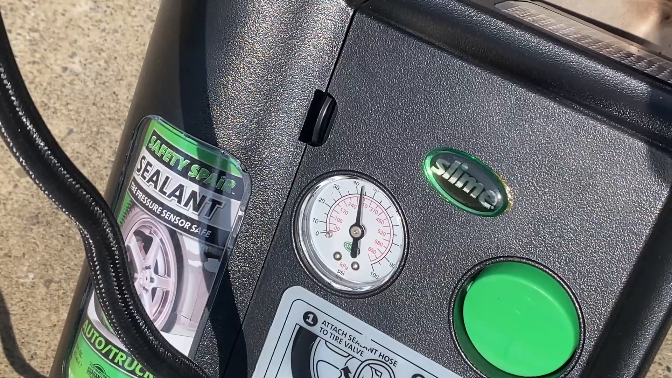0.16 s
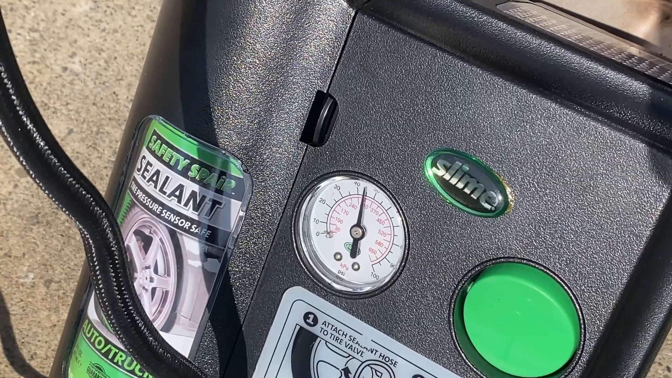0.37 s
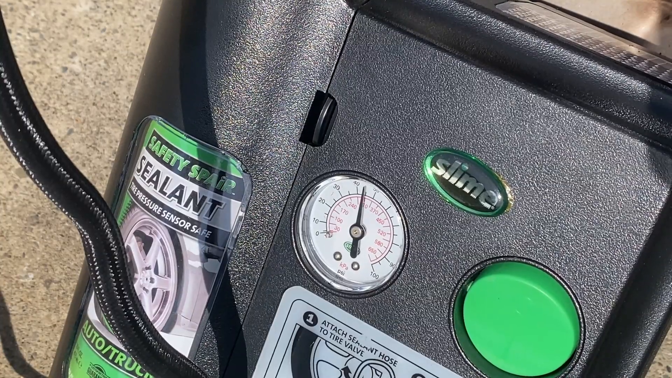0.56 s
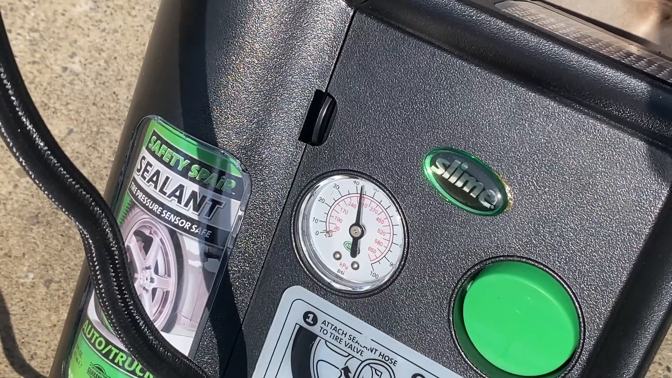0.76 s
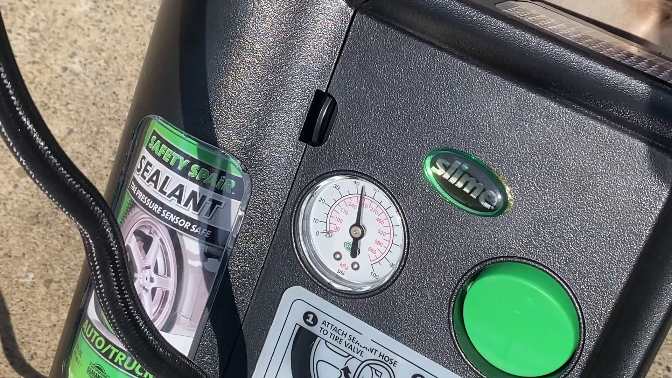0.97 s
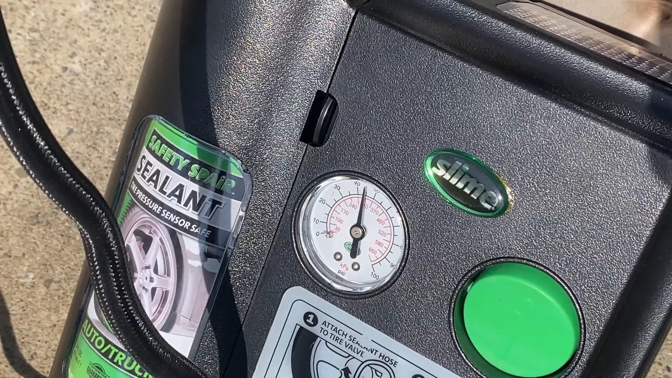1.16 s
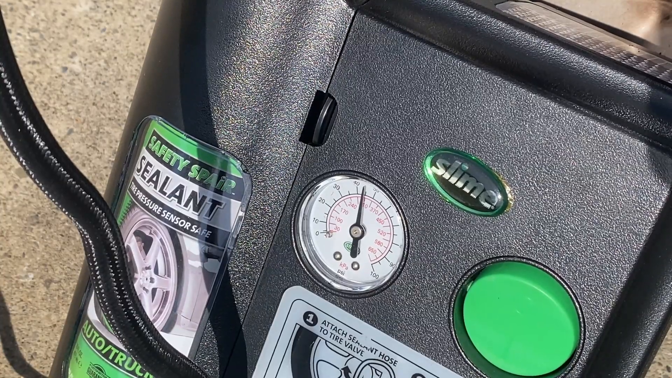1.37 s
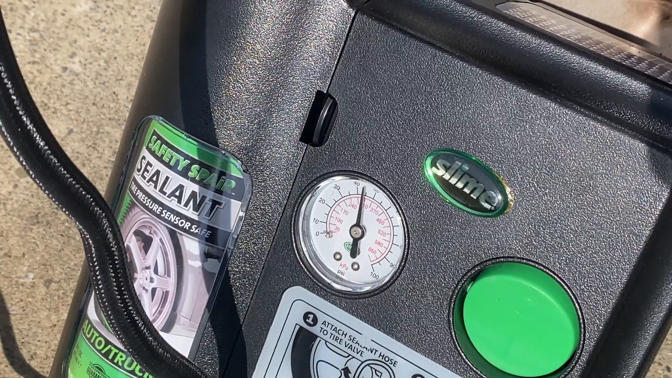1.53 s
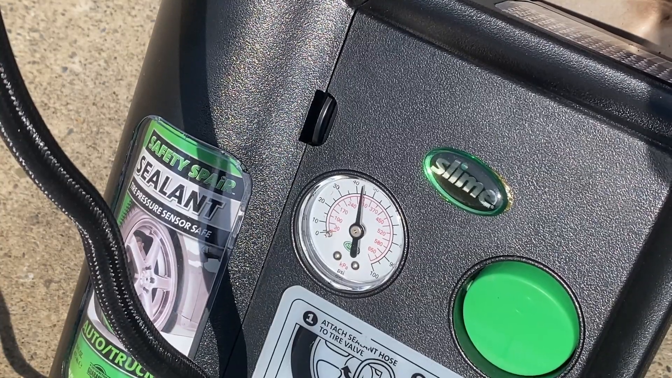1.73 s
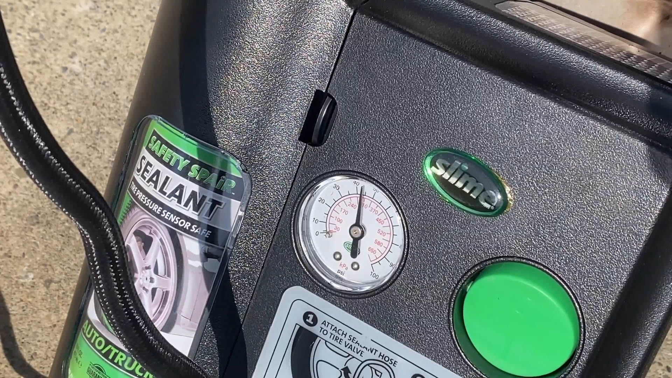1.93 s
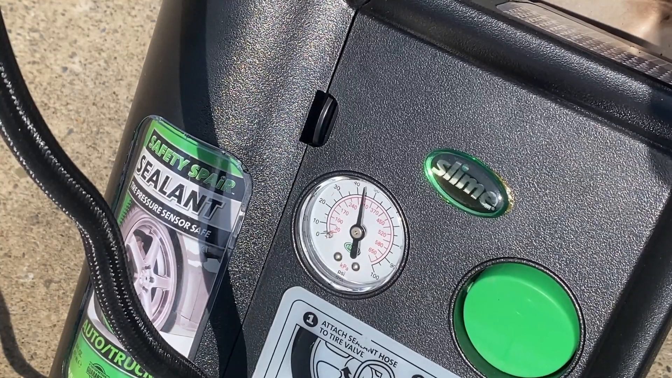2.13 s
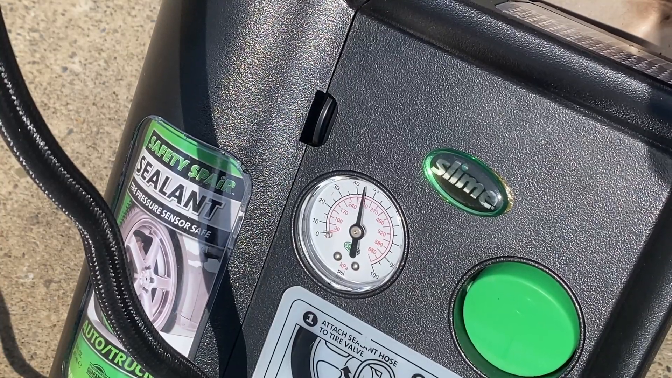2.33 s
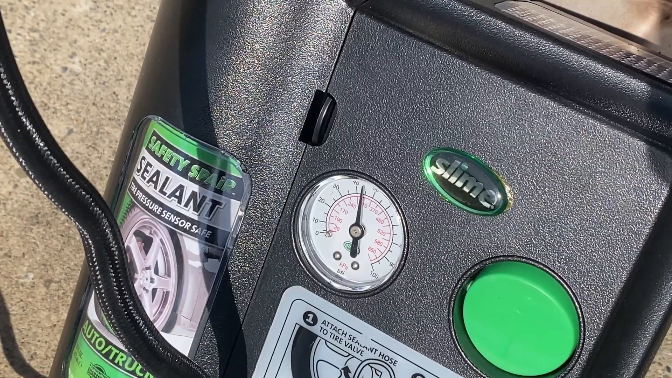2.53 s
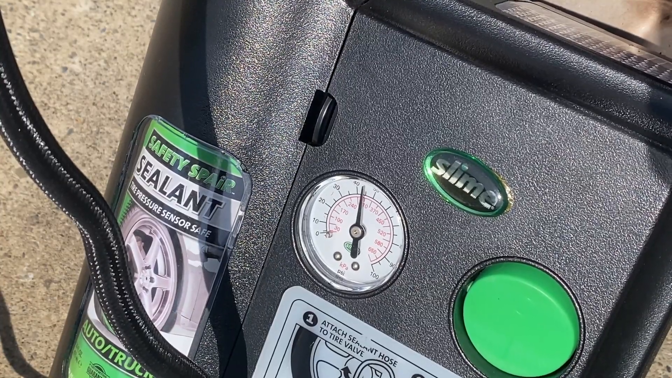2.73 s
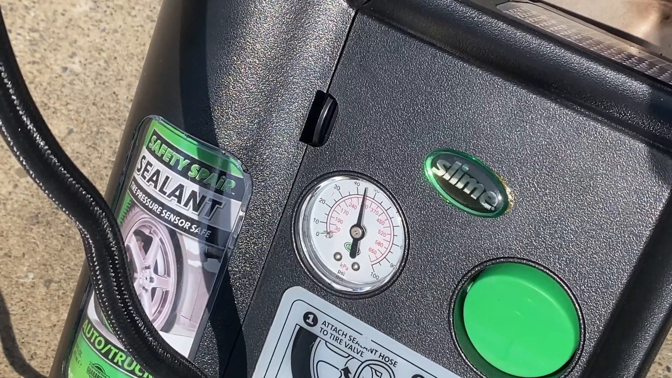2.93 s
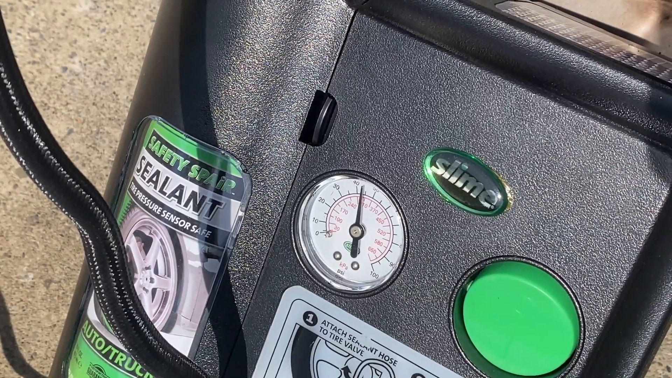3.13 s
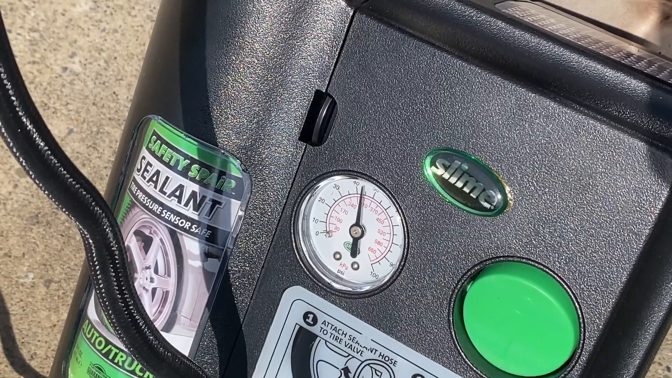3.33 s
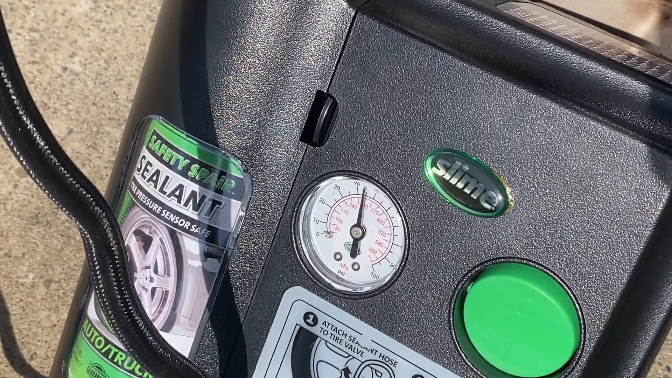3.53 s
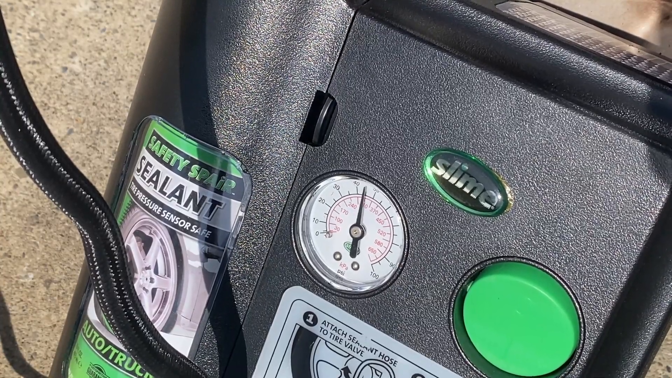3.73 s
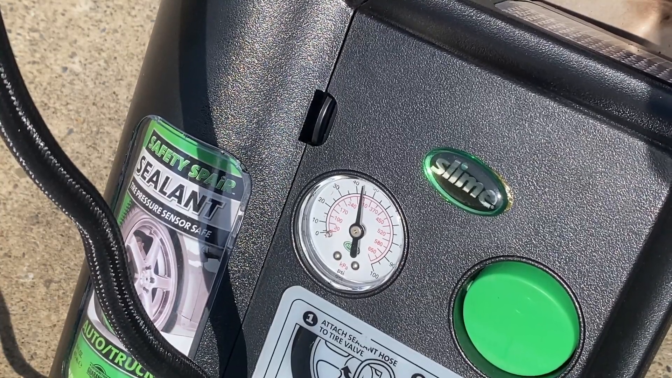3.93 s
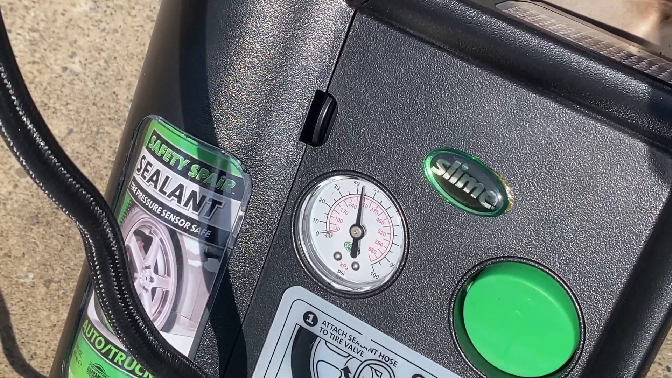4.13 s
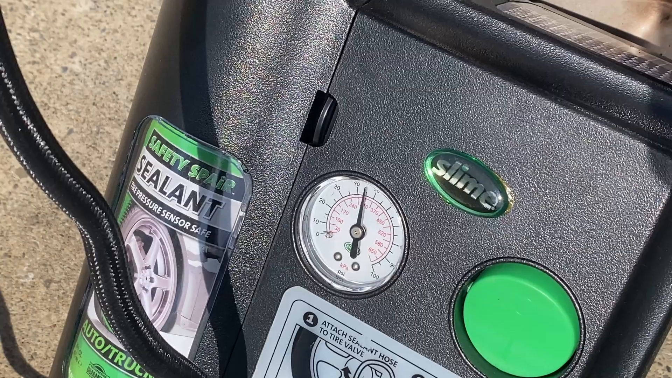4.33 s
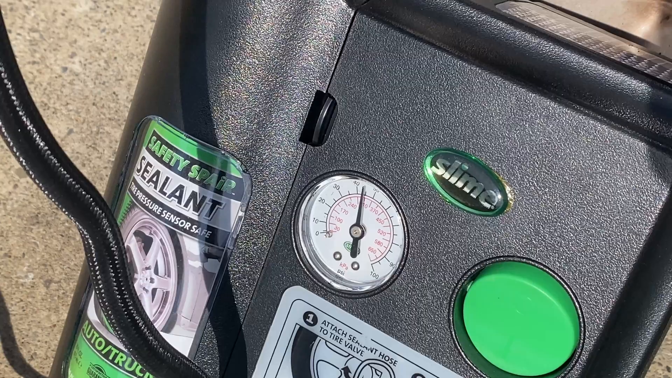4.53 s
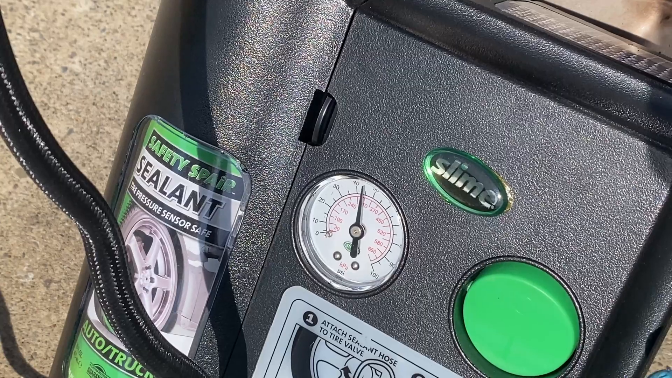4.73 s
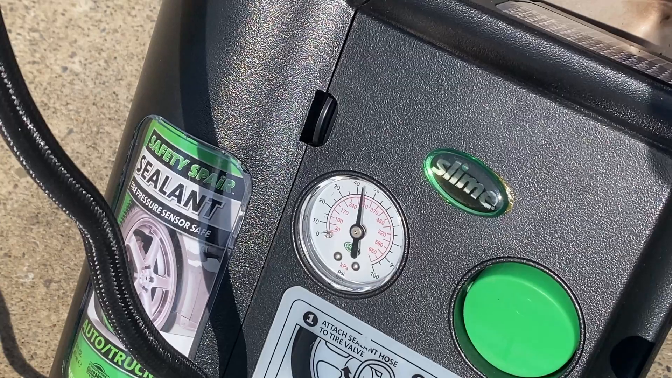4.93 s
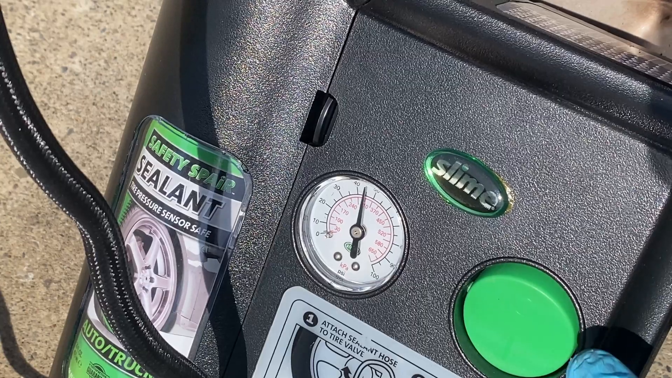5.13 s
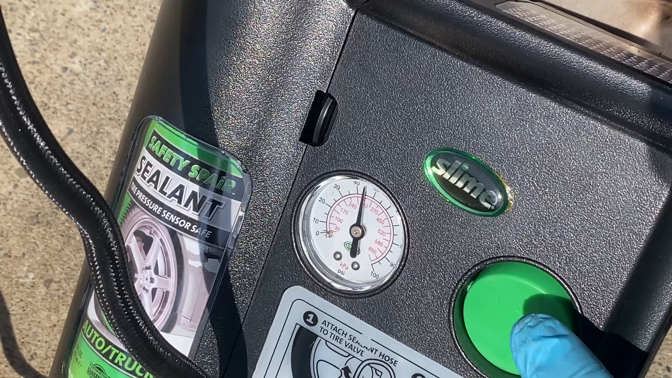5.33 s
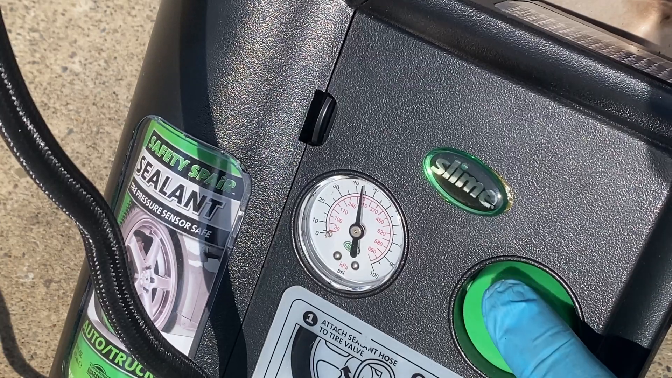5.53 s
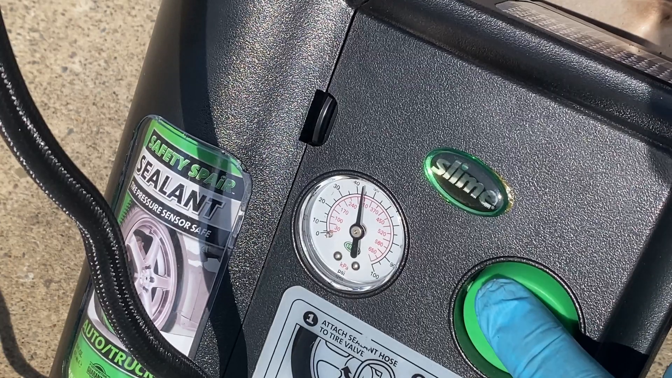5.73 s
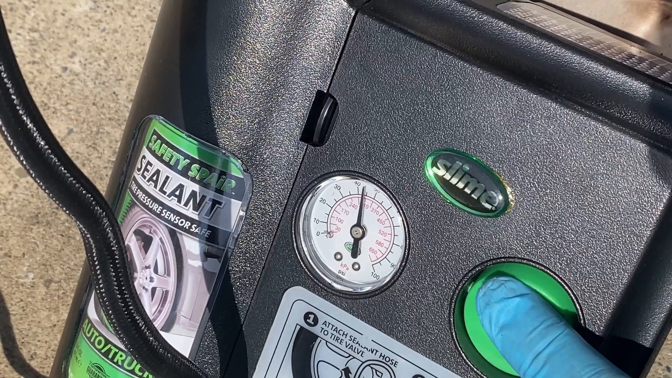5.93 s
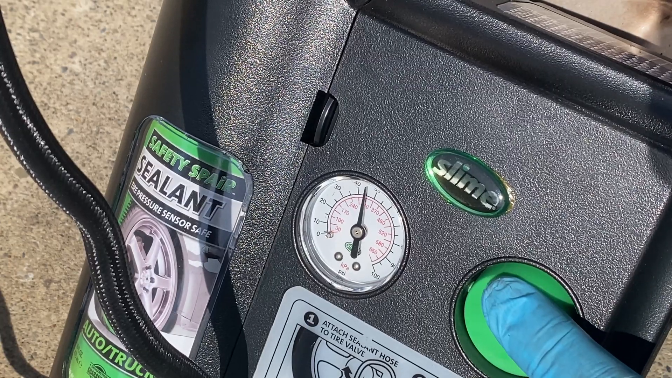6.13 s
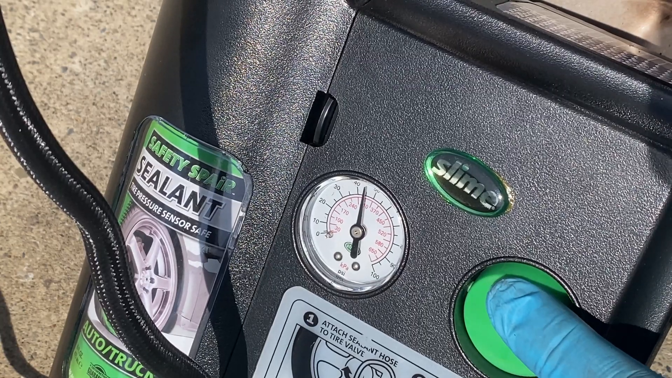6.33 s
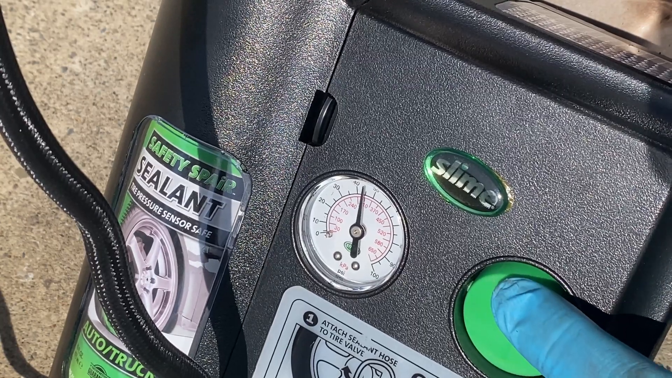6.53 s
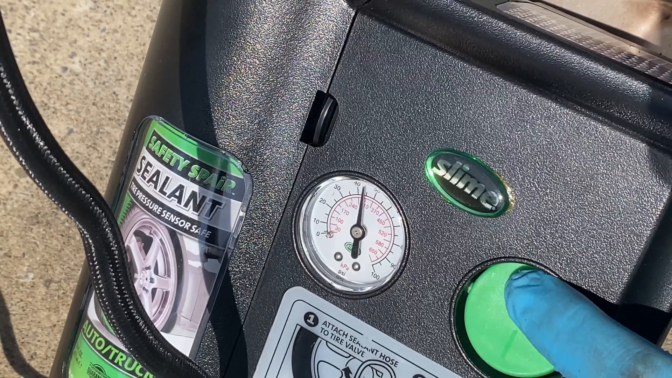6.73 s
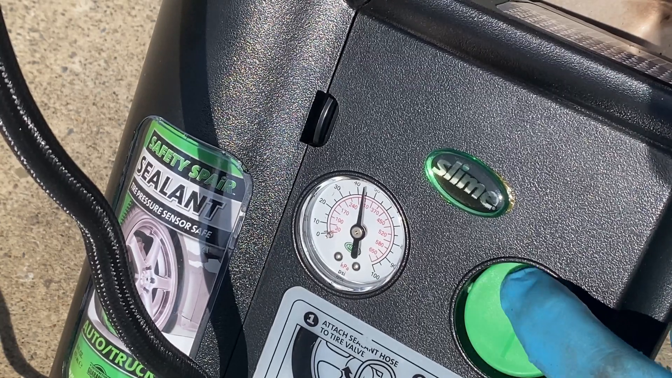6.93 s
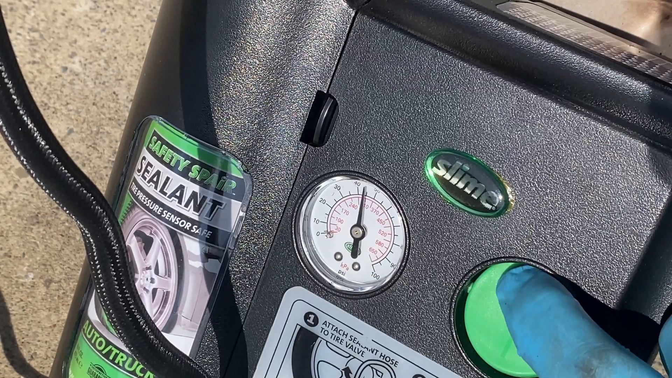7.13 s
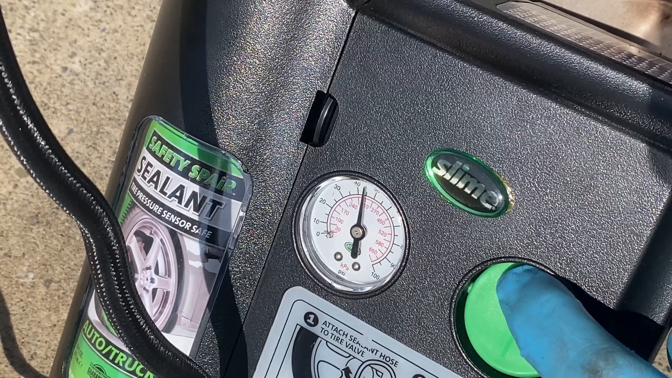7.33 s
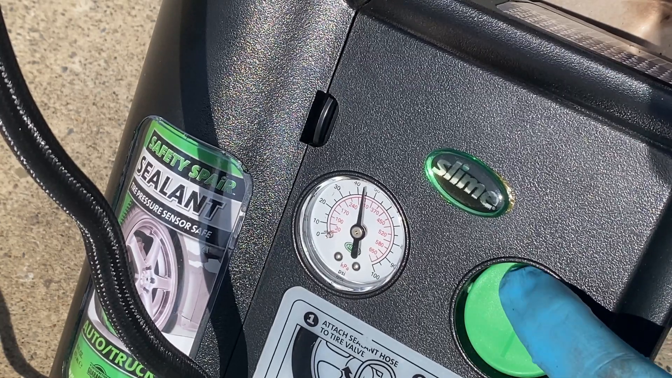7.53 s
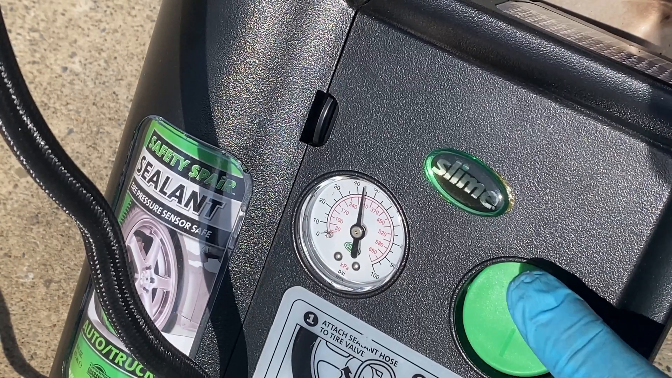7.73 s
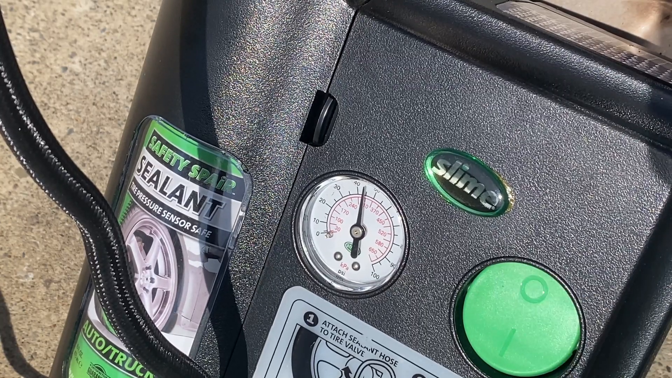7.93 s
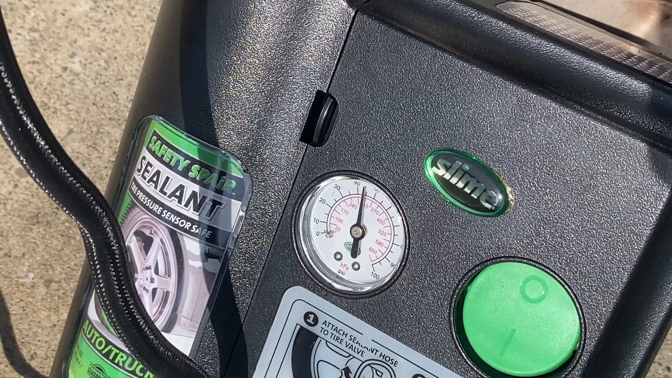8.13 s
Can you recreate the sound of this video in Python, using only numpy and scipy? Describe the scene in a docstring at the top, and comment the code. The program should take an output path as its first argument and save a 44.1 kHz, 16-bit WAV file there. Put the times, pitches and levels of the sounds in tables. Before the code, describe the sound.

From 0 s a small piston air pump is already running at full speed, very close, outdoors on concrete. About forty-one strokes a second blur into a harsh, buzzing drone, strongest in the mids around 400 to 1200 Hz, with motor hum, gear whine, dense plastic rattle, valve hiss and thin reed snaps. Its speed wavers only slightly and it grows about one decibel louder by 6.7 s; a car's low idle is mostly masked beneath. At 6.7 s the power is cut: the buzz collapses, tiny falling gear squeals chirp, and near 6.82 s a short kick-back knock with a squeaky tone ends it by about 6.9 s. The idling car's soft bass drone and rumble then emerge, throbbing about six times a second until 8.3 s. Around 7.67 s a small, dull plastic button tick sounds close by. Faint microphone hiss lies underneath.

```python
"""A small piston air pump in a plastic case runs on concrete close to a phone, while a car idles nearby.
Strokes, gear teeth and motor poles hum through the case; noisy knocks, valve puffs and reed snaps join in.
After 6.7 s the pump is switched off, coasts with short gear squeals and kicks back once as a level jump. The
car's drone, slowly wavering tones over filtered noise, is then heard louder and throbs. Near 7.7 s a button
gives small plastic ticks, made of noise bursts in narrow bands."""
import sys
import numpy as np
from scipy import signal
from scipy.fft import rfft, irfft, next_fast_len
from scipy.io import wavfile
from scipy.ndimage import uniform_filter1d

SR = 44100
rng = np.random.default_rng(int(sys.argv[2]) if len(sys.argv) > 2 else 0)


def log_audio(samples):
    """Write samples as a 16-bit WAV file to the path given in sys.argv[1]."""
    # one column per channel
    frames = np.atleast_2d(samples).T
    # limit to full scale, then quantise
    limited = np.clip(frames, -1, 1)
    pcm = np.round(limited * 32767).astype(np.int16)
    wavfile.write(sys.argv[1], SR, pcm)


N = 365588
T = np.arange(N) / SR  # time, s
SIZE = next_fast_len(N + 8192)  # transform length, with room for echoes to die
F = np.arange(SIZE // 2 + 1) * SR / SIZE  # frequencies, Hz
OFF_S = 6.7  # power cut, s


def undb(db):
    """Turn dB into an amplitude factor."""
    return np.exp(np.asarray(db) * float(np.log(10) / 20))


def level(x, db):
    """Scale a sound so its average (RMS) level is db."""
    return x * undb(db) / np.sqrt(np.mean(x ** 2))


def curves(rows):
    """Join the rows of a time table with straight lines, one curve per column after the seconds."""
    seconds, *columns = np.transpose(rows)
    return [np.interp(T, seconds, column) for column in columns]


def over_hz(points):
    """Join (Hz, value) points with straight lines over log frequency."""
    hz, value = np.transpose(points)
    return np.interp(np.log(F + 1), np.log(hz + 1), value)


def colour(x, gain):
    """Filter a sound by a gain for each frequency."""
    return irfft(rfft(x, SIZE) * gain, SIZE)[..., :N]


def band(x, low_hz, high_hz, order):
    """Keep only the band between two frequencies."""
    sos = signal.butter(order, [low_hz, high_hz], "band", fs=SR, output="sos")
    return signal.sosfilt(sos, x)


def walk(rate):
    """Random levels every 1 / rate s, joined smoothly; spread near 1."""
    step = int(SR / rate)
    coarse = np.arange(0, N / step + 1, 1 / 16)
    levels = rng.standard_normal(N // step + 2)
    smooth = uniform_filter1d(np.interp(coarse, np.arange(N // step + 2), levels), size=16)
    return np.interp(T, coarse * step / SR, 1.32 * smooth).astype(np.float32)


def bump(turn, at, width):
    """A smooth swell once a turn; place and width are shares of a turn."""
    return np.exp((np.cos(2 * np.pi * (turn - at)) - 1) / (2 * np.pi * width) ** 2)


# Resonances of the plastic case. Each row: centre in Hz, width in Hz, relative level in dB.
CASE_RESONANCES = [(467, 104, -5), (584, 130, -12), (768, 66, -3), (978, 140, -3), (1166, 155, -3),
                   (1434, 100, -6.5), (2030, 234, -15), (2713, 126, -22.5), (3114, 360, -28.5),
                   (4036, 190, -28.5), (4380, 150, -26.5), (4850, 160, -31), (7266, 390, -25),
                   (7900, 86, -26), (9240, 360, -32.5)]
# How strongly the case answers between them. Each row: frequency in Hz, relative level in dB.
CASE_BASE = [(40, -61.5), (150, -27.5), (300, -18), (600, -7), (1200, -15), (1550, -10.5), (1780, -21.5),
             (2400, -31.5), (3600, -35.5), (6300, -36), (8500, -34), (10400, -39.5), (12600, -68.5),
             (15500, -56.5)]


def case_response():
    """The plastic case answers a blow with resonances over a broad base, never before the blow."""
    power = undb(over_hz(CASE_BASE)) ** 2
    for hz, width_hz, db in CASE_RESONANCES:
        power = power + undb(db) ** 2 / (1 + ((F - hz) / (width_hz / 2)) ** 2) ** 2
    # Folding the cepstrum gives the response that starts as early as possible (minimum phase).
    cepstrum = irfft(np.log(power) / 2, SIZE)
    cepstrum[1:SIZE // 2] *= 2
    cepstrum[SIZE // 2 + 1:] = 0
    return np.exp(rfft(cepstrum))


GEAR_RATIO = 50 / 11  # motor turns per crank turn
# Tones of the piston stroke. Each row: multiple of crank speed, relative level in dB.
STROKE_TONES = [(1, -30), (2, -12.5), (3, -15), (4, -15.5), (5, -10.5), (6, -14.5), (7, -19), (8, -15),
                (9, -6), (10, 0), (11, -.5), (12, -11), (13, -2.5), (14, .5), (15, -11), (16, -10),
                (17, -7), (18, -12), (19, -9), (20, -13), (21, -14), (22, -10), (23, -6), (24, -9),
                (25, -11), (26, -9), (27, -16), (28, -11), (29, -10), (30, -17), (31, -17), (32, -18),
                (33, -11), (34, -14), (35, -9), (36, -11), (37, -12), (38, -12), (39, -15)]
# Motor unbalance and poles, shifted by the uneven load of the crank.
# Each row: multiple of motor speed, crank turns added per crank turn, relative level in dB.
MOTOR_TONES = [(1, 0, -29), (1, 1, -27), (1, 2, -23), (1, 3, -23), (1, 4, -19), (1, 5, -17), (1, 6, -14),
               (1, 14, -14), (1, 15, -15), (3, -2, -16), (3, -1, -10), (3, 0, 0), (3, 1, -16), (3, 2, -12),
               (3, 9, -14), (3, 10, -13), (3, 12, -15), (3, 13, -14), (3, 14, -13), (3, 15, -14),
               (-1, 17, -18), (-1, 18, -16), (-1, 22, -17), (-1, 27, -16), (-3, 38, -15), (-3, 49, -16),
               (-3, 50, -13), (-3, 51, -17)]
# Gear teeth meeting, with side tones. Each row: multiple of crank speed, relative level in dB.
MESH_TONES = [(43, -24), (46, -23), (47, -18), (48, -16), (49, -18), (50, -15), (51, -2.5), (53, -17),
              (55, -26), (57, -26)]


def tones(turn):
    """Steady partials of stroke, motor and gear mesh, with small random flutter."""
    flutter_db, valve_turn, phase_spread = .8, .96, -.054
    turn = (turn % 11).astype(np.float32)  # crank and motor meet again after 11 turns
    flutters = [flutter_db * walk(12) for _ in range(9)]
    slips = [.005 * walk(17) for _ in range(7)]  # radians per multiple
    # Partials away from the thump reach the air by unlike paths (radians).
    unlike = np.clip((np.abs(np.arange(64) - 11) - 3) / 4, 0, 1.5)
    offsets = (unlike * rng.standard_normal(64)).tolist()
    shakes = {k: .4 * walk(8) for k in (1, 3)}

    stroke = 0
    for k, db in STROKE_TONES:
        phase = 2 * np.pi * k * (turn - valve_turn) + k * slips[k % 7]
        phase = phase - phase_spread * (k - 11) ** 2 + offsets[k]
        stroke = stroke + undb(db + flutters[k % 9]) * np.cos(phase)

    motor = 0
    for k, added, db in MOTOR_TONES:
        phase = 2 * np.pi * (k * GEAR_RATIO + added) * turn + shakes[abs(k)]
        phase = phase - phase_spread * added ** 2 + offsets[added + 9]
        motor = motor + undb(db) * np.cos(phase)

    play = .14 * walk(60)  # backlash shakes all teeth alike
    mesh = sum(undb(db) * np.cos(2 * np.pi * k * (turn - .43) + play) for k, db in MESH_TONES)
    return stroke + motor + undb(-2.0 + flutter_db * walk(40)) * mesh


# Spots of the crank turn where parts knock. Each row: place as a share of a turn, strength.
KNOCK_SPOTS = [(.03, .5), (.21, .3), (.33, .4), (.47, .25), (.56, .35), (.66, .9), (.81, .8), (.93, .7)]
WORN, WORN_WOBBLE = .55, .6  # strength of repeating knocks; depth of the motor's push


def rattle(turn):
    """Teeth and loose parts knock densely (first); worn spots repeat each turn, pushed by the motor (second)."""
    worn = np.interp(turn, np.arange(768) / 768, rng.standard_normal(768), period=1)
    push = 1 + WORN_WOBBLE * sum(np.cos(2 * np.pi * k * GEAR_RATIO * turn) for k in (1, 3))
    # About 800 random knocks a second.
    knocks = 2.2 * (rng.random(N) < 800 / SR) * rng.standard_normal(N)
    spots = sum(strength * bump(turn, at, .015) for at, strength in KNOCK_SPOTS)
    load = 1 + spots * undb(1.5 * walk(150))
    return load * (rng.standard_normal(N) + knocks), load * WORN * worn * push


# Short hits, each on its own part of the case, most of the high ones first.
# Each row: place as a share of a turn, ring in Hz, width in Hz, level in dB against the pump's level.
STRIKES = [(.52, 1490, 260, -20), (0.629, 990, 176, -15.5), (.66, 1188, 212, -13.5), (.86, 771, 263, -15.5),
           (.02, 1110, 250, -14), (.35, 1489, 254, -18.5), (.66, 2948, 824, -29.5)]
STRIKE_TURNS, STRIKE_SCATTER_DB = .045, 3  # length of a hit in turns; spread of its strength


def strikes(turn):
    """Short scraping hits, once a turn each, ring single parts of the case."""
    out = np.zeros(N)
    for at, hz, width_hz, db in STRIKES:
        strength = undb(STRIKE_SCATTER_DB * walk(41))
        hit = bump(turn, at, STRIKE_TURNS) * strength * rng.standard_normal(N)
        out += level(band(hit, hz - width_hz / 2, hz + width_hz / 2, 2), db)
    return out


def valves(turn):
    """Air hisses past the piston and puffs as the valve opens; the puff lies in the highest treble."""
    puff = 2.3 * bump(turn, .97, .06) * undb(2.5 * walk(41)) + .6 * bump(turn, .72, .04)
    top = 1 / (1 + (8400 / (F + 1)) ** 16)
    return rng.standard_normal(N) + colour(puff * rng.standard_normal(N), top)


SNAP_AT, SNAP_HZ, SNAP_WIDTH_HZ = .9, 5500, 3400  # share of a turn; ring and its width
SNAP_SCATTER_DB, SNAP_S = 3.5, 0.0059  # spread of strength; decay time constant


def snaps(turn):
    """The valve reed snaps once a turn, each time with its own strength and a little early or late."""
    chance = rng.standard_normal((int(turn[-1]) + 2, 2))
    late = .015 * chance[turn.astype(int), 0]
    since_s = (turn - SNAP_AT - late) % 1 / SPEED[0][1]  # at the starting speed
    strength = np.tanh(chance[(turn - SNAP_AT + 1).astype(int), 1])
    tick = undb(SNAP_SCATTER_DB * strength) * np.exp(-since_s / SNAP_S)
    ring = 1 / (1 + ((F - SNAP_HZ) / (SNAP_WIDTH_HZ / 2)) ** 4)
    return colour(tick * rng.standard_normal(N), ring)


# Crank speed while powered. Each row: time in seconds, speed in turns per second (Hz).
SPEED = [(0.0, 41.78), (0.15, 41.8), (0.3, 41.62), (0.45, 41.29), (0.6, 41.48), (0.74, 41.11),
         (0.89, 41.03), (1.04, 41.29), (1.19, 41.45), (1.34, 41.2), (1.49, 41.15), (1.64, 41.5),
         (1.79, 41.32), (1.94, 41.28), (2.08, 41.6), (2.23, 41.27), (2.38, 41.05), (2.53, 41.3),
         (2.68, 41.5), (2.83, 41.5), (2.98, 41.43), (3.13, 41.57), (3.28, 41.45), (3.42, 41.65),
         (3.57, 41.52), (3.72, 41.29), (3.87, 41.49), (4.02, 41.26), (4.17, 41.31), (4.32, 41.42),
         (4.47, 41.16), (4.62, 41.44), (4.76, 41.17), (4.91, 41.48), (5.06, 41.11), (5.21, 41.04),
         (5.36, 40.94), (5.51, 41.27), (5.66, 41.11), (5.81, 40.83), (5.96, 41.06), (6.1, 40.89),
         (6.25, 40.88), (6.4, 40.71), (6.55, 41.02), (6.7, 41.02)]
# Last stroke, stall and kick-back.
# Each row: time in seconds, level change in dB against running, treble change in dB against running.
STOP = [(6.6, 0, 2), (6.735, -1, 2), (6.775, 0.5, -4), (6.79, -6, -19), (6.812, -8, -19), (6.82, 3.5, 0),
        (6.83, 0.5, -4), (6.845, -5.5, -4), (6.865, -14.5, -8), (6.89, -22.5, -11), (6.95, -47.5, 5)]
COAST_S, START_TURN = .09, .947  # time to lose half the speed; crank angle at start, share of a turn
RUN_DB, LOAD_DB_PER_S = -44.5, 0.1462  # reference level; the pump grows louder as the tyre fills
TREBLE_DB, DULLING_DB_PER_S = -11.5, 0.13  # treble against level; it hardly grows along


def pump():
    """Moving parts heard through the case, and the faces of the case that each port hears alone."""
    (powered,), (stop_db, stop_treble_db) = curves(SPEED), curves(STOP)
    speed = powered / (1 + (np.clip(T - OFF_S, 0, None) / COAST_S) ** 2)
    db = RUN_DB + LOAD_DB_PER_S * T + stop_db
    treble_db = TREBLE_DB - DULLING_DB_PER_S * T + stop_treble_db
    turn = START_TURN + np.cumsum(speed) / SR + .0015 * walk(9)

    case = case_response()
    low = 1 / (1 + (F / 2300) ** 8)
    high = 1 / (1 + (F / 6200) ** 8)
    knock, worn = rattle(turn)
    body = level(colour(knock, case * low), -4.0)
    body = body + np.clip(speed / powered, 0, 1) * strikes(turn)

    clatter = level(colour(knock + worn, case * (1 - low) * high), -1.37)
    clatter += level(colour(valves(turn), case * (1 - high)), -2.75)
    clatter += (T < OFF_S) * level(snaps(turn), -11)

    # Steady partials die as the crank slows.
    partials = np.clip((speed - 31) / 8, 0, 1) * level(tones(turn), 0.22)
    faces = level(colour(rng.permutation(knock), case * np.clip(F / 900, .2, 2.5)), -14)
    return undb(db) * (body + partials + undb(treble_db) * clatter), undb(db) * faces


# Main engine tones. Each row: time in seconds, then the pitch of three tones in Hz.
DRONE_HZ = [(0, 78.1, 107, 157.5), (6.7, 77.8, 105.7, 155.5), (7.2, 74.5, 105, 152.5),
            (8.29, 74.5, 104.5, 151.2)]
# Their slow drift before swell and flutter. Each row: time in seconds, then three levels in dB.
DRONE_DB = [(0, -61, -60, -86), (.4, -61.5, -64, -68), (1.1, -60.5, -61, -70), (1.8, -57, -67, -71),
            (2.398, -61, -78, -77), (3.201, -64, -75, -85), (4.301, -83, -63, -76), (5.401, -78, -81, -70),
            (6.2, -94, -82, -91), (6.7, -74, -77.5, -81), (7.1, -75, -69.5, -70), (7.35, -73.5, -62, -60.5),
            (7.601, -72.5, -71, -63.5), (8.29, -66, -66, -61.5)]
# Weaker engine tones. Each row: pitch in Hz, level in dB against the highest main tone.
OVERTONES = [(182, -26), (230, -19), (610, -27.5), (750, -34)]
# Engine rumble over time. Each row: time in seconds, level in dB before the ports shade it.
RUMBLE_DB = [(0, -65), (5, -70), (6.2, -87), (6.75, -58), (6.95, -50), (7.3, -51.5), (7.6, -47),
             (8.29, -50.5)]
# Tone colour of the rumble. Each row: frequency in Hz, relative level in dB per Hz.
RUMBLE_COLOUR = [(30, -31), (50, -11), (65, -3), (100, -5), (200, -14), (300, -26.5), (700, -29),
                 (1140, -43.5), (1700, -48.5), (2700, -71), (11000, -82), (14500, -97)]
# How the ports hear the car. Each row: frequency in Hz, left minus right in dB.
CAR_PORT_DB = [(60, -3.3), (110, -3.6), (150, -.6), (220, -1), (320, 2.5), (500, .3), (900, -1.5),
               (1500, .7)]
CAR_LATE_S = np.array([[.02], [.0204]])  # delay of the car's sound at the left and right port, s
SWELL_DB, SWELL_S = 15.5, 0.12  # rise of the drone after the power cut, and its time constant
# Uneven idle, heard with the swell: rate, time of a peak, depth 0-1 per tone.
THROB_HZ, THROB_PEAK_S, THROB = 6.3, 7.80, (0.51, 0.34, 0.075)


def car():
    """Wavering tones of an idling engine over its rumble; the bass is nearly alike on both ports."""
    swell = 1 - np.exp(-np.clip(T - OFF_S, 0, None) / SWELL_S)
    beat = swell * np.cos(2 * np.pi * THROB_HZ * (T - THROB_PEAK_S))
    gains = [undb(db + SWELL_DB * swell) * (1 + depth * beat)
             for db, depth in zip(curves(DRONE_DB), THROB)]

    drone = np.zeros(N)
    for hz, gain, waver in zip(curves(DRONE_HZ), gains, (.5, .5, .2)):
        flutter = undb(0.55 * walk(9.2))
        drone += gain * flutter * np.sin(2 * np.pi * np.cumsum(hz) / SR + waver * walk(6.8))
    for hz, db in OVERTONES:
        gain = gains[2] * undb(db + 0.9 * walk(8.9))
        drone += gain * np.sin(2 * np.pi * hz * T + hz / 500 * walk(14))

    shape = undb(over_hz(RUMBLE_COLOUR))
    apart = np.clip(F / 900, .1, 1)  # the ports differ more towards the treble
    mid = colour(rng.standard_normal(N), shape)
    side = colour(rng.standard_normal(N), shape * apart)
    rumble = level(np.array([mid + side, mid - side]), 0) * undb(curves(RUMBLE_DB)[0])

    tilt = undb(over_hz(CAR_PORT_DB) / 2)
    delay = np.exp(-2j * np.pi * F * CAR_LATE_S)
    return colour(np.sqrt(2) * drone + rumble, np.array([tilt, 1 / tilt]) * delay)


# Gear squeals while coasting and kicking back. Each row: start in seconds, length in seconds,
# first pitch in Hz, last pitch in Hz, level in dB before a 0.5 dB lift, second partial in dB against the first.
SQUEALS = [(6.72, .02, 1500, 1480, -52, -30), (6.724, .018, 1130, 1110, -50, -30),
           (6.734, .03, 505, 455, -48, -30), (6.756, .034, 1170, 970, -44, -30),
           (6.76, .032, 1400, 1360, -48, -30), (6.793, .02, 970, 950, -55, -30),
           (6.819, .054, 640, 580, -36, -16), (6.822, .02, 870, 850, -50, -30),
           (6.82, .03, 350, 340, -55, -30)]


def squeals():
    """Slowing gears give short falling tones that swell, sag and die."""
    out = np.zeros(N)
    for start_s, length_s, from_hz, to_hz, db, second_db in SQUEALS:
        u = np.arange(int(length_s * SR)) / SR / length_s  # share of the squeal, 0-1
        phase = 2 * np.pi * np.cumsum(from_hz + (to_hz - from_hz) * u) / SR
        shape = np.minimum(u / .035, 1) * np.exp(-np.abs(u - .27) / .7) * np.minimum((1 - u) / .25, 1)
        wobble_db = 2.2 * np.interp(u * length_s * 150, np.arange(12), rng.standard_normal(12))
        tone = np.sin(phase) + undb(second_db) * np.sin(2 * phase)
        first = int(start_s * SR)
        out[first:first + len(u)] += np.sqrt(2) * undb(db + 0.5) * undb(wobble_db) * shape * tone
    return out


# Resonances of the button cap. Each row: pitch in Hz, relative level in dB, time to fall 60 dB in seconds.
BUTTON_MODES = [(616, -4, 0.035), (784, 0.5, .03), (1050, -4, 0.04), (1390, -2.5, .035), (1750, -11, .03),
                (2570, -7, .014), (2900, -10, .014), (4300, -30, .02), (5300, -29, .06), (7000, -33, 0.054),
                (9800, -29.5, 0.06)]
# The ticks. Each row: start in seconds, base peak level in dB,
# brightness in dB per octave above the lowest resonance.
BUTTON_TICKS = [(7.663, -56.5, 1), (7.665, -46.5, -12), (7.677, -97, 14)]


def button():
    """Small plastic ticks: noise bursts in narrow resonances of the cap."""
    out, u = np.zeros(N), T[:SR // 10]
    for start_s, peak_db, bright_db in BUTTON_TICKS:
        first = int(start_s * SR)
        for hz, db, t60 in BUTTON_MODES:
            burst = np.exp(-np.log(1000) * u / t60) * rng.standard_normal(len(u))
            tick = band(burst, .89 * hz, 1.12 * hz, 4)
            octaves = np.log2(hz / BUTTON_MODES[0][0])
            gain = undb(peak_db + db + bright_db * octaves) / np.abs(tick).max()
            out[first:first + len(u)] += gain * tick
    return out


# Timing between the ports. Each row: frequency in Hz, how far left leads right in radians.
PORT_LEAD = [(20, .4), (500, .4), (1290, .3), (1720, -.6), (1980, .2), (2930, .4), (4480, .45), (5170, 0),
             (6800, 0), (7240, -1), (8100, -1.8), (8700, -3.8), (9730, -6.1), (10300, -6.4), (10900, -7.5),
             (13000, -8.2)]
# Loudness between the ports. Each row: frequency in Hz, left minus right in dB.
PORT_DB = [(60, -3.3), (110, -3), (150, -1), (220, -2.4), (320, -4), (420, -6.8), (550, 0), (770, -3),
           (1100, -.8), (1500, 1), (2100, -2.3), (3400, 0)]


def ports(x):
    """Two microphone ports shade and delay the close sound differently; the ground scatters a little into each."""
    tilt = undb(over_hz(PORT_DB) / 2) * np.exp(.5j * over_hz(PORT_LEAD))
    tail = rng.standard_normal((2, 3000)) * np.exp(-np.arange(3000) / SR / 0.036)
    scatter = rfft(tail / np.sqrt(np.sum(tail ** 2, axis=1, keepdims=True)), SIZE)
    return colour(x, np.array([tilt, 1 / tilt]) + undb(-20) * scatter)


def scene():
    """Pump, squeals and button close by, the car further off, and faint microphone hiss."""
    hiss = undb(-100) * rng.standard_normal((2, N))  # microphone self-noise
    close, faces = pump()
    opposite = np.array([[1], [-1]])  # left and right hear the faces with opposite sign
    return ports(close + squeals() + button()) + faces * opposite + car() + hiss


def record(dry):
    """The phone cuts the top sharply above 15.7 kHz."""
    return signal.sosfilt(signal.ellip(10, .2, 70, 15700, fs=SR, output="sos"), dry)


dry = scene()
out = record(dry)
log_audio(out)
```